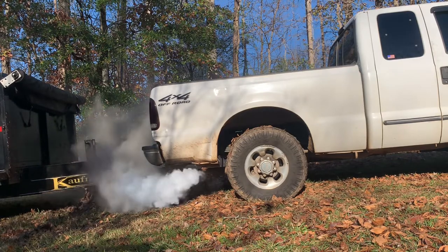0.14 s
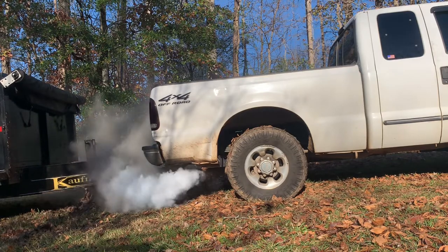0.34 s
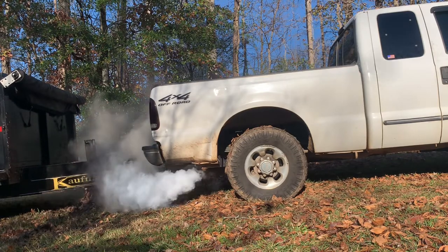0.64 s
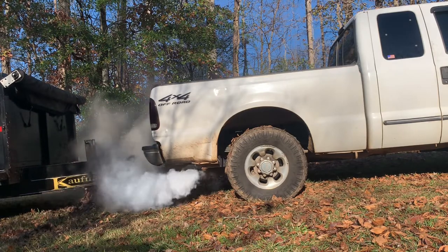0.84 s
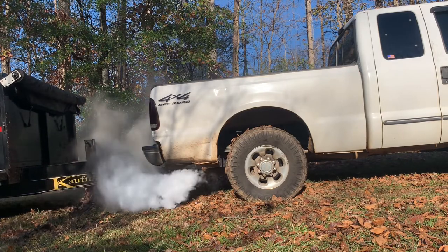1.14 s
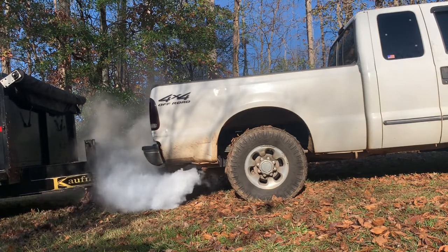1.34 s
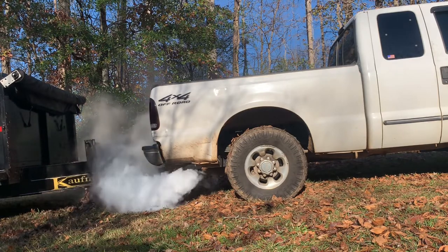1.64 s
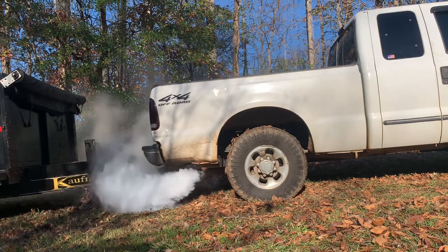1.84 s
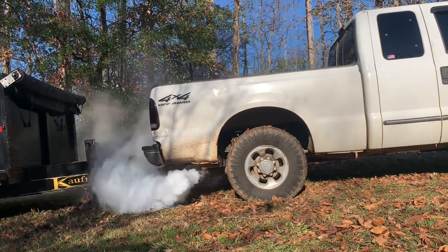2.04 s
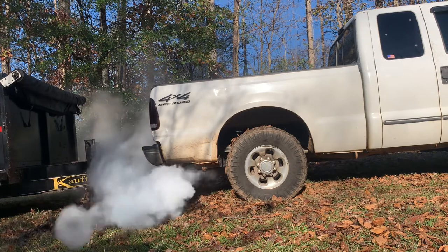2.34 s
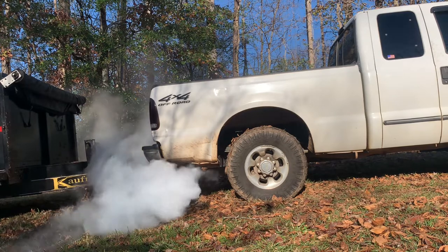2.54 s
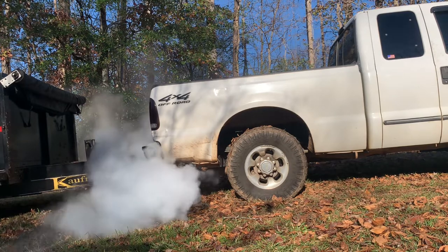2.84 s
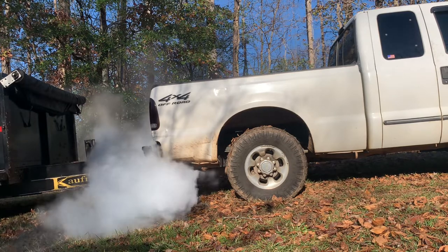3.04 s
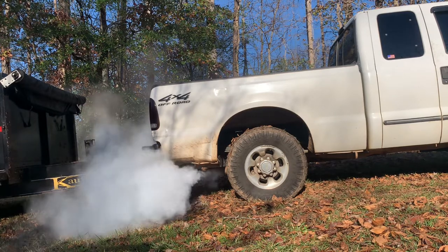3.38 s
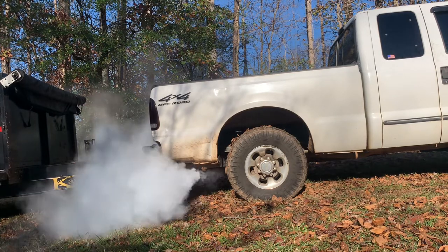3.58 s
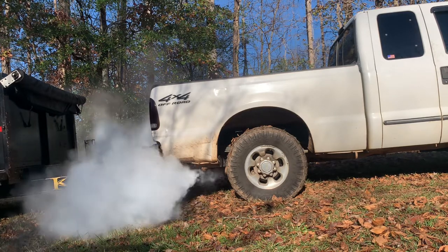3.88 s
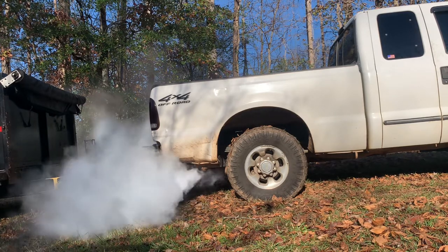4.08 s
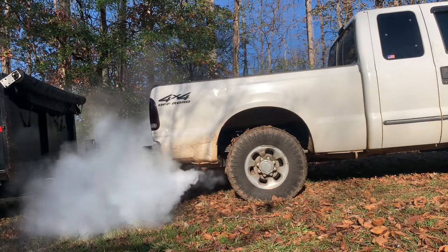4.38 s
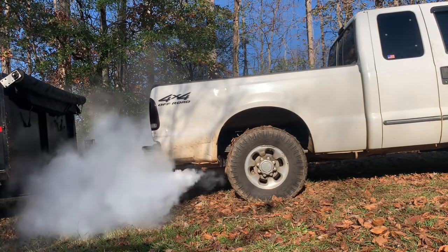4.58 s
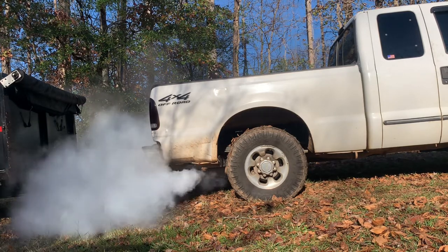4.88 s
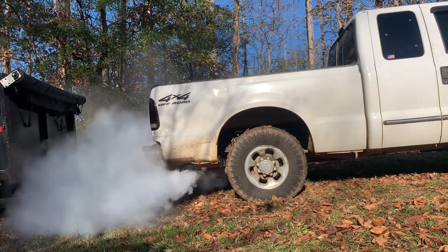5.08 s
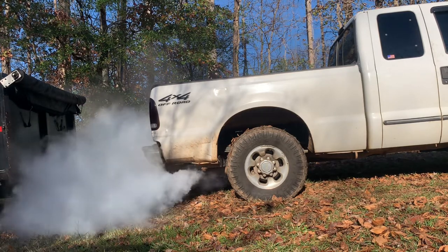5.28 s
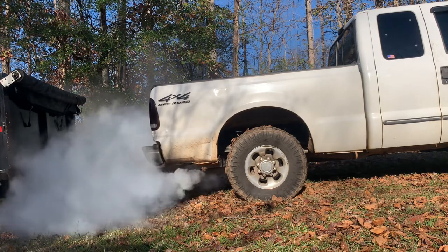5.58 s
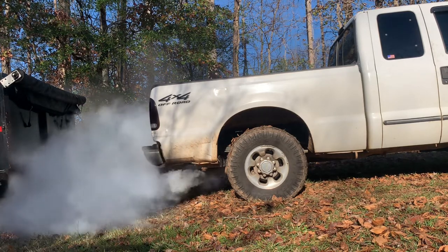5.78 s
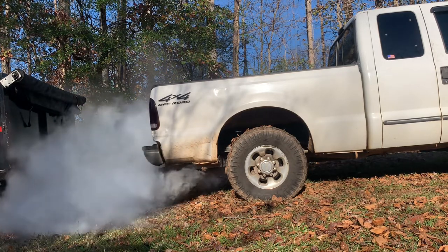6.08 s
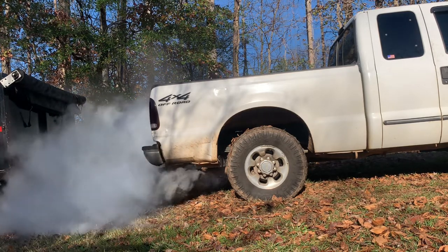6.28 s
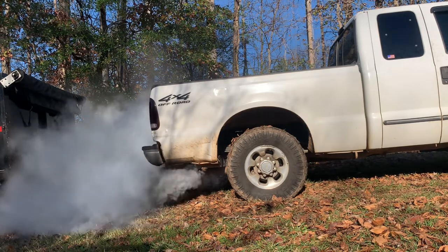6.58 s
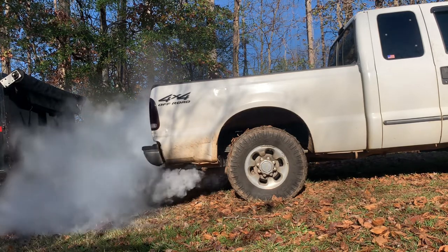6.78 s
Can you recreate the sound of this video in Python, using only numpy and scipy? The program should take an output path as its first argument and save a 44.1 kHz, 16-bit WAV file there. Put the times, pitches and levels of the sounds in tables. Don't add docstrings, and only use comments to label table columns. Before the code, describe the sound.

A starter motor churns a cold diesel in a quick, even rhythm, each compression a nasal groan with a breathy chuff. Near two seconds the cylinders catch in a rapid uneven clatter, metal rings briefly, a turbine whistles upward and the gear races. The engine fails and the starter labours on alone. Stereo outdoor pickup, engine off to the right, noise reduction momentarily swallowing the sound.

```python
import sys
import numpy as np
from scipy import signal
from scipy.fft import rfft, irfft, next_fast_len
from scipy.io import wavfile
from scipy.ndimage import uniform_filter1d, map_coordinates

SR = 44100
rng = np.random.default_rng(int(sys.argv[2]) if len(sys.argv) > 2 else 0)


def inscribe(sig):
    pcm = np.round(np.clip(np.atleast_2d(sig).T, -1, 1) * 32767)
    wavfile.write(sys.argv[1], SR, pcm.astype(np.int16))


def to_linear_factor(level_db):
    exponent = np.asarray(level_db, float) / 20
    return 10 ** exponent


N = 305172
T = np.arange(N) / SR


def unit(x):
    return x / np.sqrt(np.mean(x ** 2) + 1e-20)


def along(points, hz):
    f, v = np.transpose(points)
    return np.interp(np.log(hz + 1), np.log(f + 1), v)


def wobble(rate_hz):
    return map_coordinates(rng.standard_normal(int(N * rate_hz / SR) + 4), [T * rate_hz])


def filtered(x, response):
    m = next_fast_len(N + 8192)
    return irfft(rfft(x, m) * response(np.fft.rfftfreq(m, 1 / SR)), m)[..., :N]


# (frequency [Hz], correlation [-1..1])
ALIKE = [(170, 1), (400, 0.59), (700, 0.76), (950, 0.33), (2000, 0.65), (6000, 0.89), (8000, 0.76)]


def rush(gain_db, patchy_db):
    z = signal.stft(rng.standard_normal((2, N)), nperseg=256)[2]
    field = rng.standard_normal(z.shape[1:])
    field = uniform_filter1d(uniform_filter1d(field, size=3, axis=0), size=5, axis=1)
    pair = signal.istft(z * to_linear_factor(patchy_db * unit(field)), nperseg=256)[1][:, :N]

    def spread(hz):
        angle = np.arccos(np.clip(along(ALIKE, hz), -1, 1)) / 2
        return to_linear_factor(gain_db(hz)) * [np.cos(angle), np.sin(angle)]

    mid, side = filtered(pair, spread)
    return unit(np.array([mid + side, mid - side]))


# (time [s], boom [dB], thud [dB], half length [s])
PIPE = [(0.495, -34.5, -57, 0.045), (0.643, -58, -46, .07), (1.46, -34, -53, 0.043),
        (2.036, -36, -31, 0.035), (2.105, -27, -27.5, 0.029), (2.189, -41, -28, 0.041),
        (2.274, -46, -42, 0.041), (2.426, -35.5, -46, 0.088), (2.55, -39.5, -48, 0.063),
        (2.652, -37, -35, 0.032), (2.728, -46, -38, 0.04), (2.867, -39.5, -43, 0.08),
        (3.002, -36.5, -39, 0.053), (3.196, -56, -51, .1), (5.098, -36, -43, 0.027),
        (6.052, -33, -53, 0.034), (6.199, -60, -47, 0.093)]
# (frequency [Hz], density [dB per Hz])
THUD = [(20, -25), (35, -9), (55, 4), (80, -1), (160, -3.5), (230, -29.5)]


def exhaust():
    boom, thud = np.full(N, to_linear_factor(-52.5)), np.full(N, to_linear_factor(-47.0))
    for s, boom_db, thud_db, half_s in PIPE:
        swell = np.exp(-((T - s) / half_s) ** 2)
        boom += to_linear_factor(boom_db) * swell
        thud += to_linear_factor(thud_db) * swell
    phase = 2 * np.pi * np.cumsum(109 * (1 + 0.0505 * wobble(25))) / SR
    low = unit(filtered(rng.standard_normal(N), lambda hz: to_linear_factor(along(THUD, hz))))
    return boom * to_linear_factor(1.5 + 1.4 * wobble(30)) * np.sin(phase) + thud * low


# (time [s], level [dB])
SHIELD = [
    (1.974, -26),
    (2.021, -26),
    (2.089, -33),
]


def shield():
    ring_hz, t60_s = 2640, .2
    ring = sum(to_linear_factor(db - 60 * np.maximum(T - s, 0) / t60_s) * (T > s) for s, db in SHIELD)
    phase = 2 * np.pi * np.cumsum(ring_hz + 30 * wobble(120)) / SR
    return ring * to_linear_factor(2.5 * wobble(90)) * np.sin(phase)


# (start [s], end [s], from [Hz], to [Hz], level [dB])
TURBO = [(1.887, 1.987, 1920, 3620, -34), (1.977, 2.049, 3720, 4580, -22.5),
         (2.034, 2.214, 4710, 5900, -41), (2.327, 2.385, 4030, 4570, -29),
         (2.445, 2.482, 3890, 4230, -24.5), (2.504, 2.557, 3320, 3830, -32.5),
         (2.62, 2.75, 3380, 4580, -27), (2.81, 2.852, 3930, 4350, -28.5), (2.89, 2.94, 3400, 3744, -30),
         (2.999, 3.03, 3300, 3470, -28), (3.103, 3.143, 3247, 3623, -34)]
# (frequency [Hz], density [dB per Hz])
BLADES = [(9800, -42), (10500, -7), (11000, 7), (11500, -8), (12200, -38)]


def turbo():
    spool_s, spool_rise_s, spool_t60_s, spool_db = 1.95, .15, 3, -38
    whistle = np.zeros(N)
    rough = to_linear_factor(2.5 * wobble(140))
    for t0, t1, hz0, hz1, db in TURBO:
        u = np.clip((T - t0) / (t1 - t0), 0, 1)
        hz = hz0 + (hz1 - hz0) * np.sin(u * np.pi / 2.1) + 90 * wobble(350)
        swell = to_linear_factor(db) * np.sqrt(np.abs(np.sin(np.pi * u ** 2.2)))
        whistle += swell * np.sin(2 * np.pi * np.cumsum(hz) / SR)
    after = np.maximum(T - spool_s, 0)
    spool = to_linear_factor(spool_db - 60 * after / spool_t60_s) * (1 - np.exp(-after / spool_rise_s))
    return whistle * rough + spool * rush(lambda hz: along(BLADES, hz), patchy_db=-1.0)


# (start [s], length [s], gear [dB], air [dB])
CYCLES = [
    (-.575, .957, -1.2, 1),
    (0.383, 0.96, -1.18, 0.5),
    (1.344, 0.97, 0, 0.5),
    (3.109, .932, -0.84, 0.5),
    (4.036, 0.97, -1.46, 0.5),
    (4.986, 0.97, -1.8, 0.5),
    (5.939, 0.97, -1.5, 0),
    (6.898, 0.53, 2, 3),
]
# (start [share of cycle], air rush [dB], lull before it [dB], gear lag [ms])
CYLINDERS = [(0, -25, -38, 59.1), (.117, -25, -33.5, 55.7), (.239, -26, -33, 58), (.363, -26.5, -33, 58.2),
             (.49, -25, -32.5, 56), (0.615, -25.5, -34, 56), (0.743, -26, -34, 56.7), (.87, -26, -35, 59.4)]
CATCH_START_S, CATCH_END_S = 1.9, 3.1


def cranked():
    rows = []
    for start_s, length_s, gear_db, air_db in CYCLES:
        for k, row in enumerate(CYLINDERS):
            s = start_s + length_s * row[0]
            if -.15 < s < N / SR + .15 and not CATCH_START_S < s < CATCH_END_S:
                rows.append((s, k, gear_db, air_db))
    return rows


# (start [s], air rush [dB], lull before it [dB])
CATCH = [(1.963, -23, -35.5), (2.077, -26.5, -28), (2.137, -35.5, -30), (2.198, -30.5, -35),
         (2.26, -26, -38), (2.314, -24, -29), (2.386, -23, -34), (2.449, -21.5, -34), (2.539, -27.5, -36.5),
         (2.656, -31, -34), (2.747, -23, -32.5), (2.817, -24.5, -34), (2.911, -25, -30),
         (3.003, -24.5, -36)]


def strokes():
    rows = cranked()
    scatter_db = .7 * rng.standard_normal((len(rows), 2))
    table = []
    for (s, k, _, air_db), (rush_db, lull_db) in zip(rows, scatter_db):
        _, top_db, low_db, _ = CYLINDERS[k]
        table.append((s, top_db + air_db + rush_db, low_db + air_db + 2 * lull_db))
    return sorted(CATCH + table)


def breathing(table, skew):
    start_s, top_db, lull_db = np.transpose(table)
    place = np.interp(T, start_s, np.arange(len(start_s)))
    hump = np.abs(np.sin(np.pi * (place % 1) ** skew)) ** 0.8
    lull = np.interp(T, start_s, lull_db)
    return lull + (top_db[np.minimum(place.astype(int), len(start_s) - 2)] - lull) * hump


# (time [s], peak [dB], t60 [s])
POPS = [(0.398, -13.5, 0.15), (1.356, -16, 0.12), (1.974, -10, 0.18), (2.02, -9.5, 0.13),
        (2.091, -18, 0.11), (2.147, -15.5, 0.17), (2.24, -10, 0.1), (2.268, -7, 0.087),
        (2.325, -10.5, 0.19), (2.394, -9, 0.12), (2.475, -10, 0.13), (2.549, -14.5, 0.22),
        (2.72, -15, 0.21), (2.759, -10, 0.15), (2.834, -12, 0.13), (5.956, -15.5, 0.14)]
# (frequency [Hz], density [dB per Hz])
AIR = [(120, -19), (200, -6.5), (450, 0.5), (580, -9.5), (800, -3), (1100, -5), (1700, -2.5), (2300, 2),
       (3600, -3.5), (4200, -10), (4900, -14), (6500, -15.5), (8000, -22.5), (9000, -24)]
# (frequency [Hz], density [dB per Hz])
HISS = [(5000, -20), (7500, 14), (9500, 4.5), (11500, 7.5), (13000, -1), (14300, -9), (15700, -16)]
# (frequency [Hz], width [Hz], gain [dB])
PANELS = [(733, 62, 11), (959, 133, 7.5), (1081, 30, 11.5), (1318, 6.3, 10), (1499, 28, 9), (2570, 780, -2),
          (3400, 290, 2), (4135, 37, 11)]
# (frequency [Hz], width [Hz], gain [dB])
MANIFOLD = [(488, 97, 6.5), (2600, 75, 2.5)]


def air():
    def coloured(modes, patchy_db):
        def gain_db(hz):
            return along(AIR, hz) + sum(db / (1 + (2 * (hz - c) / w) ** 2) for c, w, db in modes)
        return rush(gain_db, patchy_db)

    table = strokes()
    blows = np.zeros(N)
    for s, db, t60_s in POPS:
        after = np.maximum(T - s, 0)
        blows += to_linear_factor(db - 6 - 60 * after / t60_s) * (1 - np.exp(-after / 0.00083))
    chuff_db = breathing(table, skew=0.81) + 0.5 + 0.69 * wobble(70)
    chuff = coloured(PANELS, patchy_db=2.0) * to_linear_factor(chuff_db)
    hiss_db = -48 + 0.71 * (breathing(table, skew=0.41) + 30) + wobble(45)
    hiss_level = np.hypot(to_linear_factor(hiss_db), to_linear_factor(-19.5) * blows)
    hiss = rush(lambda hz: along(HISS, hz), patchy_db=2.0) * hiss_level
    return chuff + hiss + blows * coloured(MANIFOLD, patchy_db=6.5)


# (tooth rate [Hz], half length [ms])
CASING_MODES = [(369, 5), (342.4, 4.28), (310, 6.82), (293.7, 5.5)]
# (mode 1 [dB], mode 2 [dB], mode 3 [dB], mode 4 [dB])
DRIVE = [(-23.5, -13.5, -14, -18.5), (-24, -14.5, -14.5, -22), (-20.5, -16.5, -15.5, -21.5),
         (-20, -19.5, -13.5, -24.5), (-23, -13, -14, -22), (-24, -14.5, -14, -19.5),
         (-21, -16.5, -17, -20.5), (-21.5, -19.5, -13.5, -23.5)]
# (time [s], peak [dB], tooth rate [Hz], half length [ms])
TAKE_UP = [(2.065, -23, 795, 7.3), (2.158, -20.5, 784, 8.6), (2.185, -34.5, 766, 12),
           (2.243, -22.5, 745.9, 4.7), (2.286, -16, 660, 12), (2.345, -23, 634.7, 9.74),
           (2.405, -13.5, 467.4, 4.2), (2.421, -16, 414.5, 3.03), (2.48, -15, 428.9, 3.54),
           (2.501, -14.5, 379, 5.32), (2.582, -5.5, 350.4, 3.7), (2.603, -14, 306, 6.3),
           (2.768, -23, 427, 3.1), (2.785, -17.5, 390, 5.9), (2.864, -8.5, 373, 4.1),
           (2.885, -18, 369, 4.3), (2.951, -13.5, 353, 4.1), (2.969, -22.5, 316, 16),
           (3.054, -17.5, 348, 12), (3.076, -16, 313, 5.7)]
# (time [s], peak [dB], tooth rate [Hz], half length [ms])
SLAMS = [
    (0.429, -14.5, 366, 2.8),
    (1.39, -12, 350, 2.7),
    (5.984, -20, 365.4, 1.6),
]
SAG_HZ_PER_S = 1414


def swells():
    mid_hz = 331.7
    load_db, load_ms = -22, 22
    scatter_db, scatter_ms, scatter_length = 1.2, 3, .25
    rows = cranked()
    chance = rng.standard_normal((len(rows), len(CASING_MODES), 3))
    passes = []
    for (s, k, gear_db, _), luck in zip(rows, chance):
        mid_s = s + CYLINDERS[k][3] / 1000
        passes.append((mid_s, load_db + gear_db, mid_hz, load_ms))
        for (hz, ms), db, (late, loud, long) in zip(CASING_MODES, DRIVE[k], luck):
            hz = hz - SAG_HZ_PER_S * scatter_ms * late / 1000
            at_s = mid_s + (mid_hz - hz) / SAG_HZ_PER_S
            peak_db = db - 1.5 + gear_db + scatter_db * loud
            passes.append((at_s, peak_db, hz, ms * np.exp(scatter_length * long)))
    return sorted(passes + TAKE_UP + SLAMS)


# (multiple of tooth rate, level [dB])
OVERTONES = [(2, -21.5), (3, -19), (4, -25), (5, -42), (7, -29)]
# (frequency [Hz], density [dB per Hz])
CASING = [(200, -42), (260, -1.5), (330, -1.5), (420, -9.5), (540, -15), (700, -40)]


def starter():
    table = swells()
    s, _, hz, _ = np.transpose(table)
    load, pull = np.zeros((2, N + SR))
    near = np.arange(-3000, 3000)
    for at_s, db, rate_hz, ms in table:
        swell = to_linear_factor(db) * np.exp(-.5 * (near / SR * 1000 / ms) ** 2)
        sag_share = 0.53 if rate_hz > 550 else (rate_hz / 320) ** 2
        load[round(at_s * SR) + near] += swell
        pull[round(at_s * SR) + near] += swell * (rate_hz - SAG_HZ_PER_S * sag_share * near / SR)
    load, idle = load[:N], to_linear_factor(-50)
    rate = (pull[:N] + idle * np.interp(T, s, hz)) / (load + idle)
    unsteady_hz = uniform_filter1d(rate, size=400) * (1 + 0.00649 * wobble(60))
    phase = 2 * np.pi * np.cumsum(unsteady_hz) / SR
    whine = load * to_linear_factor(1.5 * wobble(100)) * np.sin(phase)
    knocks = sum(to_linear_factor(db + 3.5 * wobble(50)) * np.sin(round(k) * phase) for k, db in OVERTONES)
    knocks += np.clip(1 - np.abs(rate - 650) / 110, 0, 1) * np.sin(2 * phase)
    whine += knocks * uniform_filter1d(load, size=900)
    rumble = rush(lambda hz: along(CASING, hz), patchy_db=-0.5)
    return whine + rumble * (to_linear_factor(-37.5 + 2.16 * wobble(30)) + to_linear_factor(-19.5) * load)


# (frequency [Hz], left over right [dB])
PORT_DB = [(590, -0.5), (660, -11.5), (740, -6), (950, -11.5), (1200, -2), (3500, -0.5), (5000, -7.5),
           (6500, -1.5), (8000, 0.5)]
# (frequency [Hz], lag [half turns])
LAG = [(0, 0), (290, .27), (365, .32), (480, .6), (720, .82), (900, .12), (1200, .05), (1460, .6),
       (2500, .8), (3300, 1.35), (4050, 2), (5600, 3), (6600, 4), (8200, 4.95), (9300, 5.05), (10400, 5.97),
       (11600, 6.03), (12700, 6.95), (14300, 7.05), (14900, 8)]


def scene():
    left, right = exhaust() + shield() + turbo() + air() + starter()

    def path(hz):
        return to_linear_factor(along(PORT_DB, hz)) * np.exp(-1j * np.pi * np.interp(hz, *np.transpose(LAG)))

    return np.array([filtered(left, path), right])


# (time [s], edge [Hz], extra lag near the edge [half turns])
GUARD = [(0, 740, 0), (.7, 600, 0), (1.2, 440, 0), (1.6, 360, 0), (1.85, 200, .35), (2.1, 160, 0),
         (2.7, 100, 0), (4.6, 30, 0), (4.68, 190, .55), (4.95, 200, .4), (5.15, 350, 0), (5.5, 430, 0),
         (5.8, 640, 0), (6.92, 660, 0)]


def wind_guard(left, right):
    hz, t, (z_left, z_right) = signal.stft(np.array([left, right]), SR, nperseg=2048)
    s, edge_hz, twist = np.transpose(GUARD)
    above = np.log((hz[:, None] + 1) / np.interp(t, s, edge_hz))
    share = np.clip(.5 + above / .5, 0, 1) ** 2
    turn = np.exp(-1j * np.pi * np.interp(t, s, twist) * (hz[:, None] < 450))
    mixed = z_right + share * (z_left * turn - z_right)
    return np.array([signal.istft(mixed, nperseg=2048)[1][:N], right])


def low_pass(x):
    return signal.sosfilt(signal.butter(12, 17040, fs=SR, output="sos"), x)


# (start [s], end [s], depth [0..1])
DUCKS = [
    (3.616, 3.661, 0.98),
    (3.989, 4.172, 0.98),
    (4.544, 4.706, 0.97),
    (5.495, 5.611, 0.98),
]
# (frequency [Hz], gain [dB])
DUCKED = [(30, -47.5), (400, -45), (1000, -19), (2600, -21.5), (3000, -61), (7700, -16), (8100, 1)]
# (from [Hz], to [Hz])
FLICKER = [(14350, 14900), (14900, 15400), (15400, 15800)]
# (from [Hz], to [Hz], share lost [0..1])
DEAF = [(8200, 9050, .9), (12600, 14350, .98)]
# (frequency [Hz], gain [dB])
TOP_SHELF = [(12800, 0), (14300, -6), (15800, -7)]


def record(dry):
    dry = wind_guard(*dry)
    duck = sum(np.clip(depth, 0, 1) * ((T > t0) & (T < t1)) for t0, t1, depth in DUCKS)
    duck = uniform_filter1d(uniform_filter1d(duck, size=350), size=350)
    quiet = dry * (1 - duck) + duck * filtered(dry, lambda hz: to_linear_factor(along(DUCKED, hz)))
    for lo_hz, hi_hz in FLICKER:
        lost = uniform_filter1d((wobble(12) + wobble(30) > -.6) * 1., size=500)
        quiet -= lost * filtered(quiet, lambda hz: (hz > lo_hz) & (hz <= hi_hz))
    centre = quiet.mean(axis=0)
    quiet -= filtered(centre, lambda hz: sum(share * (hz > lo) * (hz < hi) for lo, hi, share in DEAF))
    difference = quiet - quiet.mean(axis=0)
    quiet -= filtered(difference, lambda hz: .95 * (hz > 10400) * (hz < 11650))
    mix = filtered(quiet, lambda hz: to_linear_factor(along(TOP_SHELF, hz)) * (hz < 15800))
    return low_pass(mix)


dry = scene()
out = record(dry)
inscribe(out)
```